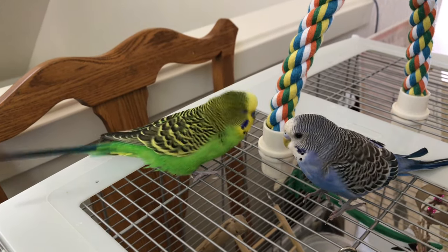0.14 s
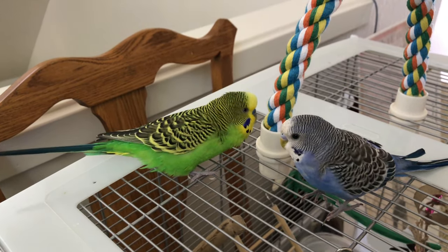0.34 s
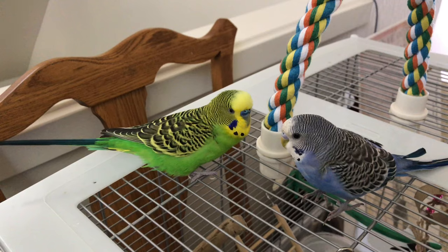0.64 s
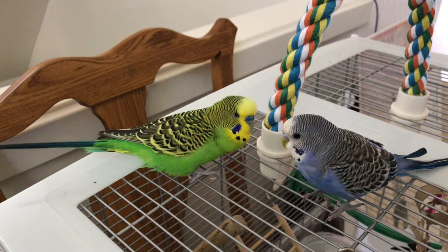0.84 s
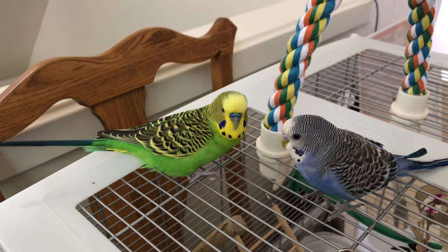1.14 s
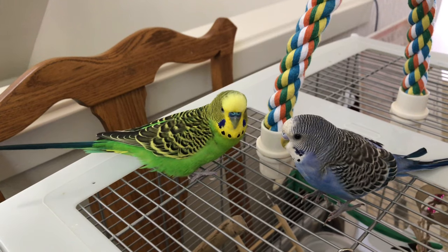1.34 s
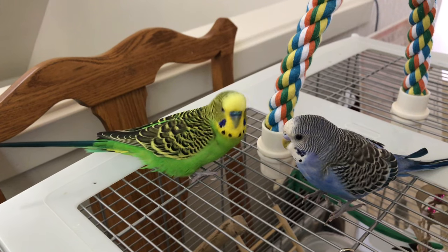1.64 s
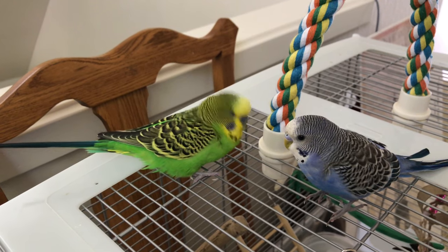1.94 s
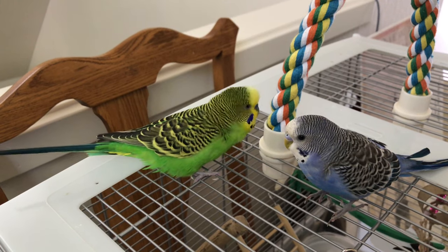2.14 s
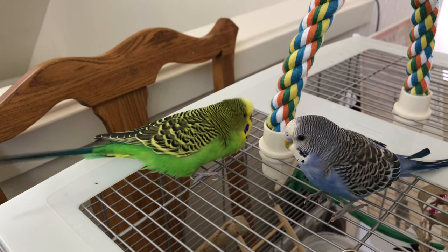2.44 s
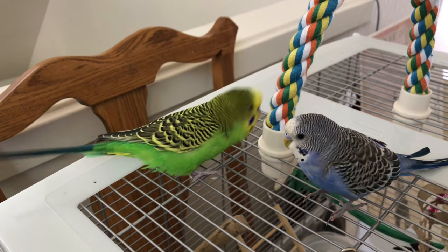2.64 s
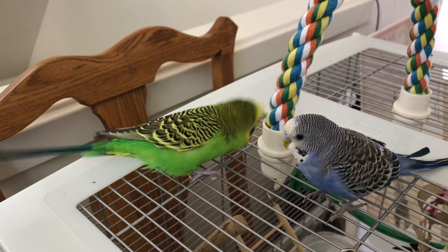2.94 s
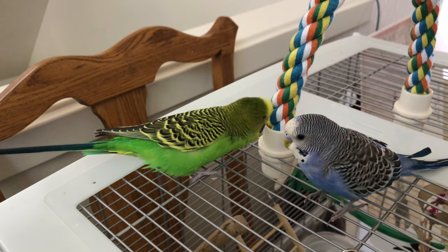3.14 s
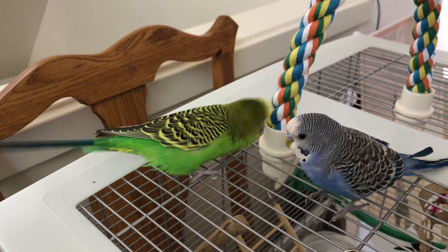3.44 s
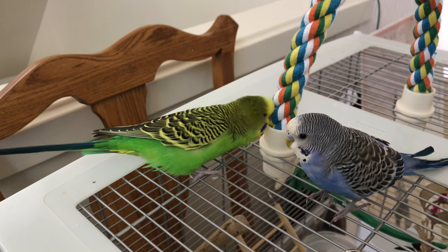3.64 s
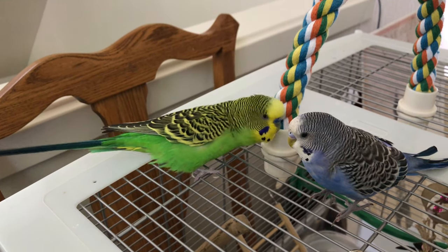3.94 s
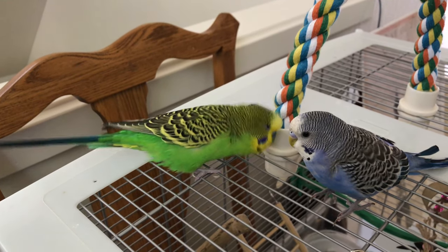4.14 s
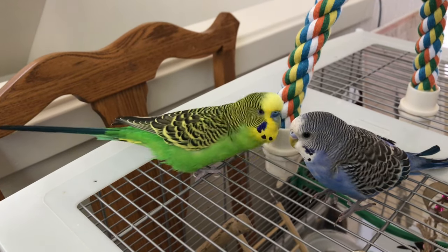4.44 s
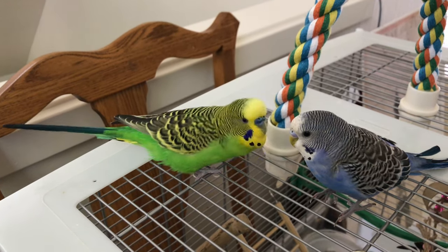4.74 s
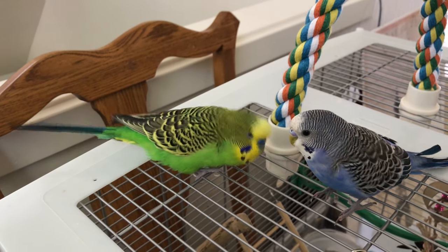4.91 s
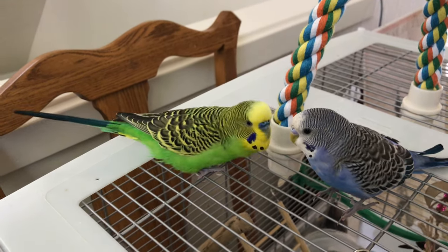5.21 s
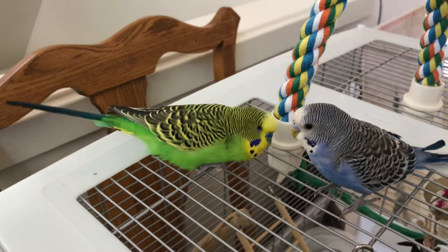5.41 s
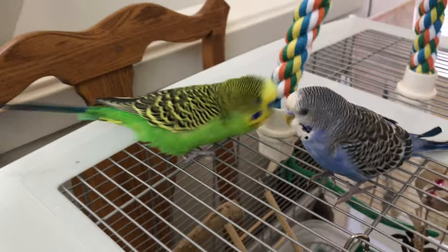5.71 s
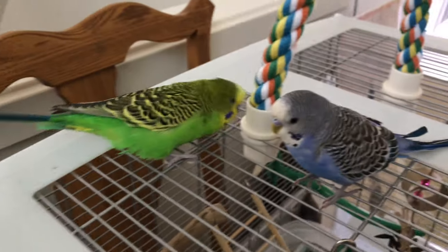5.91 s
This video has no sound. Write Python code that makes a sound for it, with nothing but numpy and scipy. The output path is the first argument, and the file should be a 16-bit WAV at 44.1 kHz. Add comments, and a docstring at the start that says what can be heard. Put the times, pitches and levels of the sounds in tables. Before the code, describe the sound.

Indoors, a budgie gives bubbling pips and tiny croaks, one harsh short screech, then a spaced row of sharp buzzy chirps over faint hum.

```python
"""Clicks, croaks, whistles and pips come first, over a steady hum: one of two small parrots on a cage top warbles.
A screech follows, then a row of buzzy chirps, each led by a click. Soft coos sound before the screech, before
the chirps and among them; short chips sound among and after the chirps. A pulsing membrane rung by throat and beak
makes chirps, chips, croaks and coos; flapping noise the screech; near sines whistles and pips; noise bursts clicks.
A quiet room rings faintly; the phone is hand-held at arm's length, and near the end the moving hand rumbles in it."""
import sys
import numpy as np
from scipy import signal
from scipy.fft import rfft, irfft
from scipy.io import wavfile
from scipy.ndimage import uniform_filter1d

SR = 44100
rng = np.random.default_rng(int(sys.argv[2]) if len(sys.argv) > 2 else 0)


def elevation(decibels):
    """Turn decibel levels (scalar or array-like) into linear amplitude ratios."""
    levels = np.asarray(decibels, float)
    return 10 ** (levels / 20)


def put_to_file(sound):
    """Save the sound as 16-bit audio at rate SR, in the file named by the first command-line argument."""
    columns = np.atleast_2d(sound).T  # one column per channel
    safe = np.clip(columns, -1, 1)
    whole_steps = np.round(safe * 32767)
    wavfile.write(sys.argv[1], SR, whole_steps.astype(np.int16))


N = 267598  # samples

# buzzy chirps, one list a chirp: (time [s], pitch [Hz], overtone level [dB])
CHIRPS = [
    [(2.925, 712, -40), (2.94, 707, -31), (2.965, 649, -35.5), (2.978, 628, -39), (2.998, 719, -47.5),
     (3.02, 838, -61), (3.047, 970, -66)],
    [(3.727, 790, -38), (3.735, 784, -35), (3.755, 732, -38), (3.771, 791, -40), (3.805, 970, -45.5),
     (3.825, 1042, -52), (3.843, 1052, -39.5), (3.851, 1010, -47)],
    [(4.101, 758, -39), (4.109, 790, -31.5), (4.123, 751, -33), (4.153, 771, -39), (4.195, 842, -44.5),
     (4.213, 917, -49), (4.231, 980, -41.5), (4.241, 973, -39), (4.249, 960, -57)],
    [(4.47, 922, -51), (4.478, 916, -41.5), (4.502, 929.5, -35.5), (4.53, 866, -39.5), (4.59, 841, -45.5),
     (4.61, 846, -39), (4.617, 900, -51)],
    [(4.883, 780, -40), (4.893, 830, -32.5), (4.939, 781, -41.5), (4.979, 790, -49.5), (5.015, 824, -43.5),
     (5.027, 800, -51.5)],
    [(5.298, 723, -44), (5.314, 787, -38.5), (5.33, 810, -38.5), (5.356, 778, -41), (5.398, 836, -45),
     (5.432, 887, -48), (5.438, 884, -41), (5.446, 828, -51)],
    [(5.689, 830, -35), (5.693, 825, -36.5), (5.709, 752, -34), (5.739, 854, -44), (5.753, 838, -38.5),
     (5.769, 913, -50.5), (5.799, 1020, -43.5), (5.821, 1073, -42), (5.832, 1030, -52)],
]
# one row a chirp: (fundamental at full effort [dB], widest throat resonance [Hz], widest at [share of length],
# throat half-width [Hz], open-beak ring [dB])
CHIRP_THROATS = [(-38.5, 1900, 0.02, 710, -37), (-46, 4050, 0.7, 660, -42), (-42.5, 3990, 0.45, 620, -25),
                 (-42, 4500, 0.18, 1600, -8), (-39.5, 4600, 0, 1160, -5), (-43, 3830, 0.25, 850, -28.5),
                 (-43, 4360, 0.61, 830, -37)]
# short chips: (start [s], length [s], starting pitch [Hz], overtone peak [dB], starting throat resonance [Hz])
CHIPS = [(4.364, 0.022, 1183, -43, 2270), (5.944, 0.032, 995, -48, 2380), (6.059, 0.028, 837, -38.5, 3050)]
# low croaks: (start [s], length [s], starting pulse rate [Hz], overtone level at the turn [dB],
# turn at [share of length, held within 0.05-0.95], kind)
CROAKS = [(0.115, 0.029, 489, -45.5, 1, "open"), (0.163, 0.022, 530, -31.5, .3, "tight"),
          (0.674, 0.03, 446.3, -42, 0.6, "open"), (0.725, 0.026, 549, -30, 0.46, "tight"),
          (1.518, .037, 135.9, -44, 0.6, "rasp"), (3.431, 0.02, 213, -37.5, 0.4, "creak"),
          (3.443, 0.06, 320.3, -29, .33, "squawk")]
# throat of each kind of croak: (start re turn [dB], throat from [Hz], throat to [Hz], half-width [Hz],
# second ring [Hz], second ring [dB])
CROAK_THROAT = {"open": (-11.5, 2548, 1750, 362, 955, -2), "tight": (-10.5, 1849, 1650, 307, 950, -29),
                "rasp": (-6.5, 1700, 1600, 200, 3100, -5.5), "creak": (-3, 4400, 4801, 2202, 953, 2.5),
                "squawk": (-7, 4054, 3950, 452, 1005, -16)}
# grain of each kind of croak: (roughness [0-1], fundamental [dB], buzz [dB], breath re overtones [dB],
# end re turn [dB])
CROAK_GRAIN = {"open": (0.05, -51, -27, -25.5, 4), "tight": (0.0122, -56, -32, -39.5, -12.5),
               "rasp": (.2, -64.5, -10.5, -14, -21.5), "creak": (0.31, -84, -18, -14.5, -14),
               "squawk": (0.1767, -58, -38, -22.5, -22.5)}
# glide of each kind of croak: (pulse rate at the end [multiple of the start])
CROAK_GLIDE = {"open": 1.1, "tight": .96, "rasp": 1.05, "creak": 1.15, "squawk": 1.06}
# soft gliding coos: (start [s], length [s], pitch from [Hz], pitch to [Hz], fundamental peak [dB])
COOS = [(2.099, .065, 477, 550, -50), (2.639, .11, 568, 376, -54.5), (3.454, .09, 296, 627, -52.5)]
# the screech: (time [s], level [dB], throat resonance [Hz])
SCREECH = [(2.375, -42.5, 3760), (2.386, -30, 4640), (2.402, -26.5, 4540), (2.43, -36, 4570),
           (2.47, -53.5, 4660)]
# whistled notes: (start [s], length [s], pitch from [Hz], pitch to [Hz], peak level [dB rms])
WHISTLES = [(0.209, 0.023, 1675, 1630, -35), (0.256, 0.018, 1640, 1470, -42.5),
            (0.302, .024, 1580, 1580, -44), (0.342, 0.028, 1690, 1604, -37),
            (0.766, 0.028, 1640, 1557, -36.5), (0.82, .025, 1603, 1608, -37),
            (0.864, 0.027, 1656, 1570, -40.5), (0.916, 0.027, 1620, 1610, -39.5),
            (1.749, .018, 3520, 3230, -61), (1.763, 0.035, 2163, 1817, -40.5),
            (1.8, 0.026, 2910, 2940, -51), (2.265, 0.026, 3720, 3950, -51),
            (2.305, 0.016, 2074, 2120, -42.5), (2.325, 0.011, 3170, 3120, -24.5)]
# pips of a few cycles: (time of the top [s], peak [dB], pitch at the top [Hz], fall [ms])
PIPS = [(0.1577, -27, 1736, 1.4), (0.2015, -23.5, 1850, 1.6), (0.2507, -31.5, 1760, 1.1),
        (0.2948, -34.5, 1884, 1.9), (0.3891, -35, 2140, 1.5), (0.7195, -31, 1710, 1.3),
        (0.7226, -25, 1780, .8), (0.7583, -41, 1740, 0.93), (0.8164, -31.5, 1700, 2.4),
        (0.8615, -30, 1865, 1.5), (0.9112, -32.5, 1700, 2), (0.957, -29, 2150, 0.88),
        (1.8428, -42.5, 2050, 0.38), (2.2833, -39, 3290, 1.8), (2.2858, -33, 2960, 4.1),
        (2.2905, -34.5, 2266, 4.6), (2.3222, -25.5, 3195, 1.9), (2.335, -29.5, 2700, 1.1),
        (2.3398, -25.5, 3160, 2.3), (2.35, -29, 2630, 1.5), (2.3562, -32, 2540, 1.7),
        (2.364, -35.5, 2410, 3.1), (2.3726, -23, 3500, 1), (2.4981, -37, 2430, 0.37)]
# clicks in the throat: (time [s], peak [dB], ring [Hz])
CLICKS = [(0.1074, -27, 2330), (0.6664, -40, 1770), (1.504, -43, 1660), (2.0785, -36.5, 2400),
          (2.0845, -35, 1700), (2.1345, -51, 1500), (2.6313, -18.5, 1620), (2.9184, -33, 2080),
          (3.1704, -40, 3200), (3.428, -33, 3820), (3.7205, -30.5, 2340), (4.095, -25.5, 2730),
          (4.3497, -38.5, 2170), (4.4607, -28.5, 3430), (4.8731, -14, 4300), (5.2874, -29, 3010),
          (5.6815, -24.5, 2500), (5.9363, -39, 2030), (6.0506, -42.5, 2800)]
# windpipe and beak colour: (frequency [Hz], level [dB])
WINDPIPE = [(1000, 2.5), (1600, 7), (2100, 4.5), (2600, 3), (5300, -5), (6200, -12), (7400, -13.5),
            (10300, -28), (15000, -33)]
# what the two microphones hear differently of the bird: (frequency [Hz], side minus mid [dB])
BIRD_SIDE = [(500, -22.5), (2000, -23.5), (4000, -14.5), (6000, -17.5), (8500, -2), (12000, -20.5)]
# grip of the hand on the phone: (time [s], thud level [dB])
HAND = [(5.02, -66), (5.12, -75), (5.21, -59), (5.41, -58), (5.5, -70), (6.068, -74)]
# colour of the room's air noise: (frequency [Hz], relative density [dB per Hz])
ROOM_AIR = [(15, -53.5), (25, -26), (108, -4), (223, -7), (309, -3.5), (363, -7), (463, -8), (591, -14.5),
            (659, -14.5), (734, -14.5), (2160, -27), (14800, -37), (16000, -36.5)]
# width of the air noise: (frequency [Hz], side minus mid [dB])
AIR_SIDE = [(60, -18.5), (200, -7.5), (380, -10), (700, -7), (8000, -8), (15000, -9.5)]
# hum lines: (frequency [Hz], level [dB rms], waver [dB, before it is scaled down])
HUM = [(120, -65, -4), (460, -63.5, 3)]

CHIRP_ROUGHNESS = 0.011  # 0-1, shared by chirps and chips
CHIRP_BREATH_DB = -26.5  # re overtones, before any trim; shared by chirps and chips


def read(table, at):
    """Columns of a table joined by straight lines."""
    first, *columns = np.transpose(table)
    return [np.interp(at, first, c) for c in columns]


def arch(start, length, turn, *columns):
    """Table of a note from (start, turn, end) values; turn is a share of the length."""
    points = np.array([0, np.clip(turn, 0.05, 0.95), 1])
    return np.transpose([start + length * points, *columns])


def span(table):
    """First sample and sample times of a note."""
    first, last = int(table[0][0] * SR), min(int(table[-1][0] * SR), N)
    return first, np.arange(first, last) / SR


def add(track, start, x, edge_ms=0.76):
    """Mix a note in with soft ends."""
    x = x[:N - start]
    i = np.arange(len(x))
    fade = np.clip(np.minimum(i, len(x) - i) / (edge_ms * SR / 1000), 0, 1)
    track[start:start + len(x)] += x * fade


def level(x, db):
    """Set the rms level."""
    return x * elevation(db) / np.sqrt(np.mean(x ** 2))


def colour_db(table, hz):
    """Spectrum read on a log-frequency axis."""
    f, db = np.transpose(table)
    return np.interp(np.log(np.maximum(hz, 1)), np.log(f), db)


def shaped(x, table):
    """Colour a sound by a spectrum."""
    f = np.fft.rfftfreq(len(x), 1 / SR)
    return irfft(rfft(x) * elevation(colour_db(table, f)), len(x))


def band(x, lo_hz, hi_hz):
    """Band-pass, two poles a side."""
    return signal.sosfilt(signal.butter(2, [lo_hz, hi_hz], "band", fs=SR, output="sos"), x)


def ring(f, hz, width_hz):
    """Response of one resonance."""
    return 1 / (1 + 1j * (f - hz ** 2 / f) / width_hz)


def walk(n, rate):
    """Smooth chance, rate turns a second, spread near 1."""
    k = max(int(SR / rate), 1)
    steps = np.repeat(rng.standard_normal(n // k + 1), k)
    return 1.6 * uniform_filter1d(uniform_filter1d(steps, k), k)[:n]


def voice(hz, low_db, high_db, throat_hz, second_hz, rough, half_width_hz, second_db, buzz_db, breath_db):
    """A pulsing membrane: pure fundamental, overtones rung by throat and second cavity, a breath puff a cycle."""
    n, rate = len(hz), np.mean(hz)
    rough = rough + 0.05 * np.exp(-np.arange(n) / (0.011 * SR))  # the membrane takes a moment to settle
    phase = 2 * np.pi * np.cumsum(hz / SR)
    # uneven periods smear the overtones
    shaky = phase + 2 * np.pi * np.cumsum(hz * 0.38 * rough * walk(n, rate) / SR)
    k = np.arange(2, int(15000 / hz.max()))[:, None]  # overtone numbers
    f = k * hz
    throat = ring(f, throat_hz, 2 * half_width_hz) ** 2
    second = elevation(second_db) * ring(f, second_hz, 0.37 * second_hz) ** 2
    tract = throat + second + 1j * elevation(buzz_db)
    swell_db = 2.6 * np.array([walk(n, 80) for _ in k])  # each overtone swells alone
    tract = tract * elevation(colour_db(WINDPIPE, f) + swell_db)
    tract = tract / np.sqrt(np.sum(abs(tract) ** 2, axis=0) / 2)
    overtones = np.real(np.sum(tract * np.exp(1j * k * shaky), axis=0))
    overtones = overtones * elevation(7.9 * rough * walk(n, rate))
    puff = band(rng.standard_normal(n), 7000, 11500) * (1 + 0.7 * np.cos(shaky))
    fundamental = np.sqrt(2) * elevation(low_db) * np.cos(phase)
    return fundamental + elevation(high_db) * (overtones + level(puff, breath_db))


def chirps():
    """The membrane pulses high and clean while the throat resonance rises and sinks with the beak."""
    throat_start, throat_end = 0.71, 0.7  # share of the widest throat as the beak opens and as it shuts
    snap = 0.81  # power; under 1 the beak opens and shuts briskly
    fundamental_follows = 0.4  # dB per dB of effort
    buzz_base_db, buzz_follows = -16, 0.4  # buzz grows with the open-beak ring, dB per dB
    breath_follows, breath_change_db = -0.063, -6.5  # dB per dB of open-beak ring; change by the end
    out = np.zeros(N)
    for chirp, (low_db, wide_hz, top, half_hz, beak_db) in zip(CHIRPS, CHIRP_THROATS):
        first, t = span(chirp)
        hz, db = read(chirp, t)
        top_s = t[0] + top * np.ptp(t)
        quarter_turns = np.interp(t, [t[0], top_s, t[-1]], [0, 1, 2])
        opening = np.sin(np.pi / 2 * quarter_turns).clip(0) ** snap
        shut = np.where(t < top_s, throat_start, throat_end)
        throat_hz = wide_hz * (shut + (1 - shut) * opening)
        fundamental_db = low_db + fundamental_follows * (db - db.max())
        buzz_db = buzz_base_db + buzz_follows * beak_db
        along = (t - t[0]) / np.ptp(t)
        breath_db = CHIRP_BREATH_DB + breath_follows * beak_db + breath_change_db * along
        add(out, first, voice(hz, fundamental_db, db, throat_hz, 5160, CHIRP_ROUGHNESS, half_hz,
                              beak_db, buzz_db, breath_db))
    return out


def chips():
    """Short clean notes of the membrane whose pitch and throat sink together."""
    pitch_sag, throat_sag = 0.12, 0.12  # shares lost by the end
    overtone_edge_db, low_edge_db = -4, -24.5  # ends of overtones and of fundamental, re their tops
    low_db = 0.5  # fundamental re overtones at the top
    ends, sink = np.array([1, 0, 1]), np.array([0, 0.3, 1])
    out = np.zeros(N)
    for start, length, hz, db, throat_hz in CHIPS:
        chip = arch(start, length, 0.5, hz * (1 - pitch_sag * sink), db + low_db + low_edge_db * ends,
                    db + overtone_edge_db * ends, throat_hz * (1 - throat_sag * sink))
        first, t = span(chip)
        pitch_hz, fundamental_db, overtones_db, chip_throat_hz = read(chip, t)
        add(out, first, voice(pitch_hz, fundamental_db, overtones_db, chip_throat_hz, 7500, CHIRP_ROUGHNESS,
                              half_width_hz=200, second_db=-39, buzz_db=-46, breath_db=CHIRP_BREATH_DB))
    return out


def croaks():
    """The membrane pulses low, its roughness and throat set by the kind of croak."""
    out = np.zeros(N)
    for start, length, rate_hz, turn_db, turn, kind in CROAKS:
        start_db, from_hz, to_hz, half_hz, ring_hz, ring_db = CROAK_THROAT[kind]
        rough, low_db, buzz_db, breath_db, end_db = CROAK_GRAIN[kind]
        croak = arch(start, length, turn, [turn_db + start_db, turn_db, turn_db + end_db])
        first, t = span(croak)
        overtones_db, = read(croak, t)
        along = (t - start) / length
        hz = rate_hz * CROAK_GLIDE[kind] ** along
        throat_hz = from_hz + (to_hz - from_hz) * along
        add(out, first, voice(hz, low_db, overtones_db, throat_hz, ring_hz, rough, half_hz,
                              ring_db, buzz_db, breath_db))
    return out


def coos():
    """The membrane glides low and softly, its fundamental above the overtones."""
    top, rise_db, fall_db = 0.23, -3, -10.5  # share of the length; start and end re peak
    overtones_db = -13.5  # re fundamental
    out = np.zeros(N)
    for start, length, from_hz, to_hz, peak_db in COOS:
        coo = arch(start, length, top, [peak_db + rise_db, peak_db, peak_db + fall_db])
        first, t = span(coo)
        db, = read(coo, t)
        hz = from_hz * (to_hz / from_hz) ** ((t - start) / length)
        add(out, first, voice(hz, db, db + overtones_db, throat_hz=2200, second_hz=950, rough=0.057,
                              half_width_hz=900, second_db=0.5, buzz_db=-35, breath_db=-32))
    return out


def screech():
    """The membrane flaps chaotically: noise in uneven throbs through a wide throat and a weaker low ring."""
    out = np.zeros(N)
    first, t = span(SCREECH)
    db, throat_hz = read(SCREECH, t)
    flap = rfft(rng.standard_normal(len(t)) * elevation(1.8 * walk(len(t), 450)))
    f = np.fft.rfftfreq(len(t), 1 / SR) + 1  # 1 Hz up, clear of zero
    flap = flap * elevation(0.62 * colour_db(WINDPIPE, f))
    low_throat, high_throat = (irfft(flap * ring(f, hz, 2600) ** 2, len(t))
                               for hz in (throat_hz.min(), throat_hz.max()))
    # a crossfade slides the throat between its two ends
    share = (throat_hz - throat_hz.min()) / (np.ptp(throat_hz) + 1)
    low_ring = irfft(flap * ring(f, 3370, 650) ** 2, len(t))
    cry = (1 - share) * low_throat + share * high_throat + elevation(-12.5) * low_ring
    add(out, first, elevation(db) * level(cry, 0))
    return out


def whistle(hz):
    """Near sine with faint second and third partials."""
    phase = 2 * np.pi * np.cumsum(hz / SR)
    return np.sin(phase) + elevation(-32) * np.sin(2 * phase) + elevation(-46) * np.sin(3 * phase)


def whistles():
    """Held near sines that glide, unsteady in pitch and level in the middle of the range."""
    attack_s, release_s, rise_db, fall_db = 0.0028, 0.0079, -1, -13  # start and end re peak
    settles = 0.7  # power of time: under 1 the glide is quick at first
    out = np.zeros(N)
    for start, length, from_hz, to_hz, peak_db in WHISTLES:
        end = start + length
        note = [(start, peak_db + rise_db), (start + attack_s, peak_db),
                (end - release_s, peak_db), (end, peak_db + fall_db)]
        first, t = span(note)
        db, = read(note, t)
        hz = from_hz + (to_hz - from_hz) * (abs(t - start) / length) ** settles
        shake = np.interp(hz, [1700, 1900, 3050, 3160], [0.25, 1.0, 0.94, 0.17])
        loudness = np.sqrt(2) * elevation(db + shake * walk(len(t), 170))
        shaky_hz = hz * (1 + 0.039 * shake * walk(len(t), 281))
        add(out, first, loudness * whistle(shaky_hz))
    return out


def pips():
    """Near sines of a few cycles that drop in pitch as they die."""
    before = 220  # samples ahead of the top
    ms = np.arange(-before, 660) * 1000 / SR
    out = np.zeros(N)
    for top_s, db, hz, fall_ms in PIPS:
        rise_ms = 0.34 + 0.45 * fall_ms
        rise = np.exp(-(ms / rise_ms) ** 2)
        fall = np.exp(-(np.abs(ms) / fall_ms) ** 0.84)
        shape = np.where(ms < 0, rise, fall)
        sinking_hz = hz * (1 - 0.025 * np.clip(ms, -3, 6))
        add(out, int(top_s * SR) - before, elevation(db) * shape * whistle(sinking_hz))
    return out


def clicks():
    """A burst of a few sharp pulses rings the windpipe for some milliseconds."""
    out = np.zeros(N)
    t = np.arange(1024) / SR
    f = np.fft.rfftfreq(len(t), 1 / SR)[1:]
    burst = (t / 0.00048) ** 2 * np.exp(-t / 0.00077) + 0.16 * np.exp(-t / 0.027)
    no_bass = f / (f + 1200)  # the small beak radiates no bass
    colour = elevation(1.07 * colour_db(WINDPIPE, f))
    for (start, db, hz), grit in zip(CLICKS, rng.standard_normal((len(CLICKS), len(t)))):
        pulses = burst * grit * abs(grit)  # squaring the noise sharpens its peaks
        tube = 0.53 + ring(f, hz, 710)
        spectrum = rfft(pulses)[1:] * tube * colour * no_bass ** 2
        click = irfft(np.append(0, spectrum))
        add(out, int(start * SR), elevation(db) * click / abs(click).max(), edge_ms=0.14)
    return out


def walls(x):
    """Dense echoes after a few milliseconds, a treble layer dying sooner; much alike in both microphones."""
    t60_s, high_t60_s = 0.41, 0.38
    t = np.arange(SR // 2) / SR
    tails = []
    for grit in rng.standard_normal((2, len(t))):
        low = band(grit, 740, 12700) * elevation(-60 * t / t60_s)
        high = band(grit, 7400, 14000) * elevation(-60 * t / high_t60_s)
        tails.append((low + high) * np.clip(t / 0.0043 - 1, 0, 1))
    mid, side = (signal.fftconvolve(x, tail / np.sqrt(np.sum(tail ** 2)))[:N] for tail in tails)
    return mid + 0.45 * side * np.array([[1], [-1]])


def hand():
    """Low thuds shared by both microphones and a rub that pushes them in opposition."""
    first, t = span(HAND)
    grip_db, = read(HAND, t)
    rub_db = grip_db + 8
    thud, rub = np.zeros(N), np.zeros(N)
    thud_noise = level(band(rng.standard_normal(len(t)), 48.7, 78), 0)
    rub_noise = level(band(rng.standard_normal(len(t)), 110, 142), 0)
    add(thud, first, elevation(grip_db) * thud_noise, edge_ms=26)
    add(rub, first, elevation(rub_db) * rub_noise, edge_ms=26)
    return np.array([thud + rub, thud - rub])


def room_tone():
    """Steady coloured air noise, its width set by frequency, and two wavering hum lines."""
    mid, side = (shaped(rng.standard_normal(N), ROOM_AIR) for _ in range(2))
    side = shaped(side, AIR_SIDE)
    out = level(np.array([mid + side, mid - side]), -61.5)
    for hz, db, waver_db in HUM:
        turn = 2 * np.pi * hz * np.arange(N) / SR + 0.5 * walk(N, 6)
        loudness = np.sqrt(2) * elevation(db + waver_db * 0.19 * walk(N, 25))
        line = loudness * np.sin(turn + np.array([[0.15], [-0.15]]))  # phase apart in the microphones
        out = out + line * elevation(np.array([[hz / 400], [-hz / 400]]))  # leans left, more so higher up
    return out


def scene():
    """The bird a little left of centre, its echo, the room and the hand."""
    room_db = -17
    bird = chirps() + chips() + croaks() + coos() + screech() + whistles() + pips() + clicks()
    lagged = np.imag(signal.hilbert(bird))  # a phase lag between the ports
    apart = shaped(lagged, BIRD_SIDE) * np.array([[1], [-1]])
    direct = bird * elevation(np.array([[0.6], [-0.6]]))
    return direct + apart + elevation(room_db) * walls(bird) + room_tone() + hand()


def roll_off(x):
    """The treble ends steeply here."""
    return signal.sosfilt(signal.butter(12, 16490, fs=SR, output="sos"), x)


def record(dry):
    """The finished mix as the phone delivers it."""
    return roll_off(dry)


dry = scene()
out = record(dry)
put_to_file(out)
```